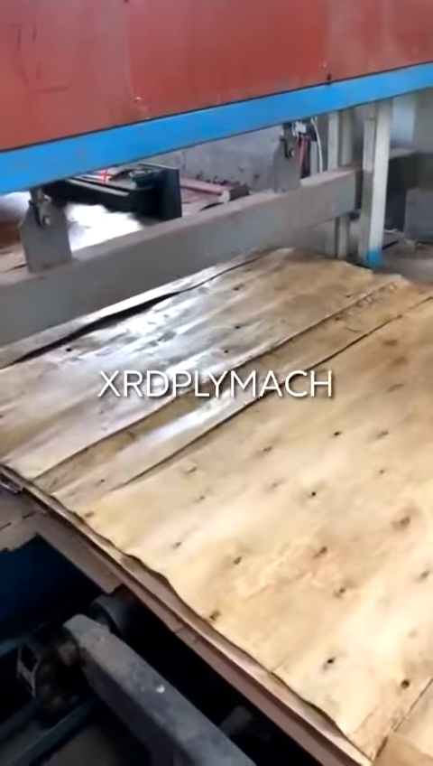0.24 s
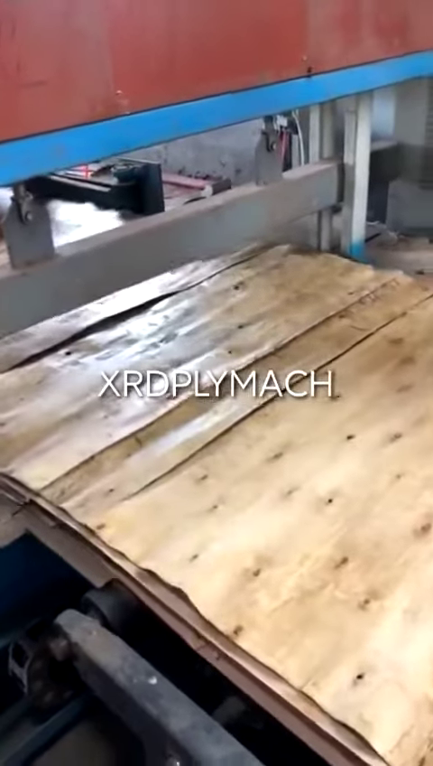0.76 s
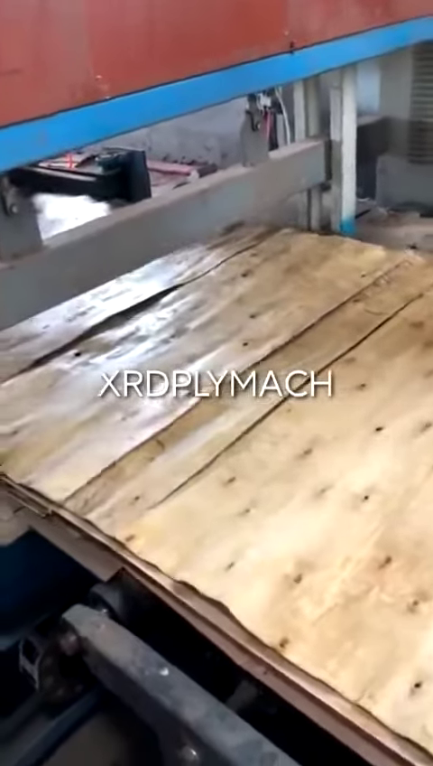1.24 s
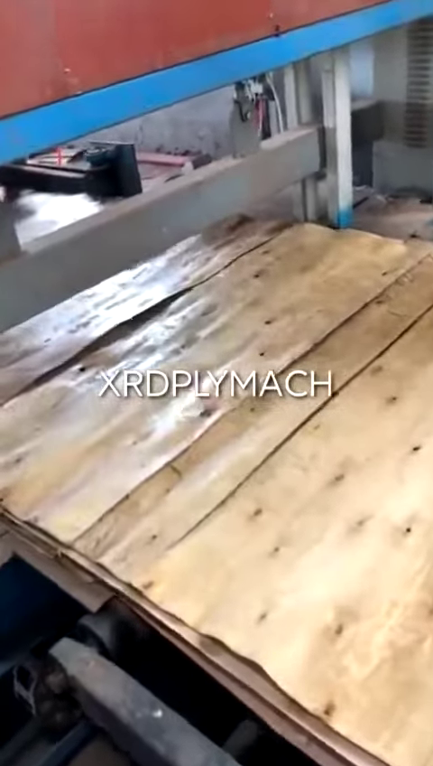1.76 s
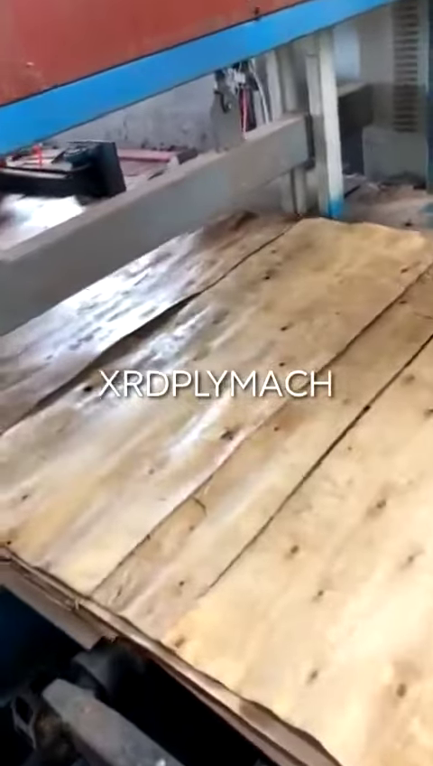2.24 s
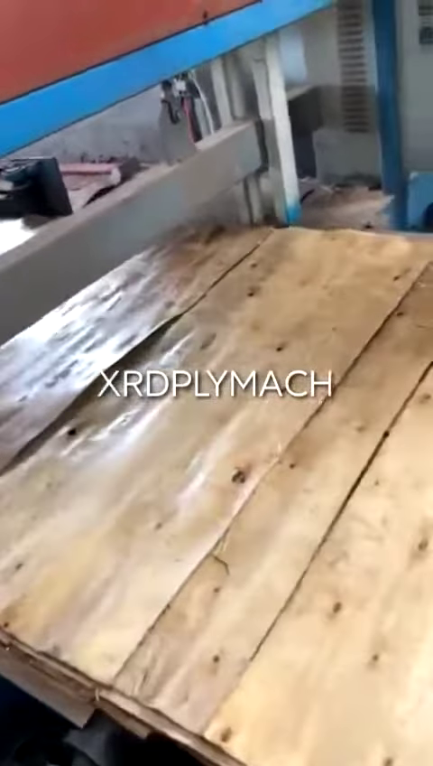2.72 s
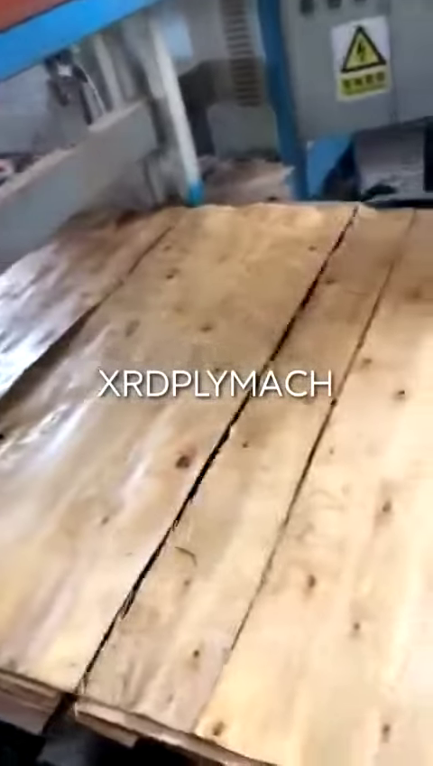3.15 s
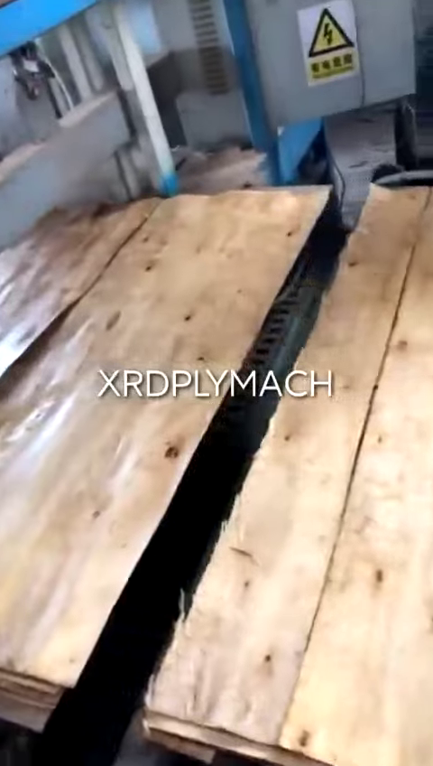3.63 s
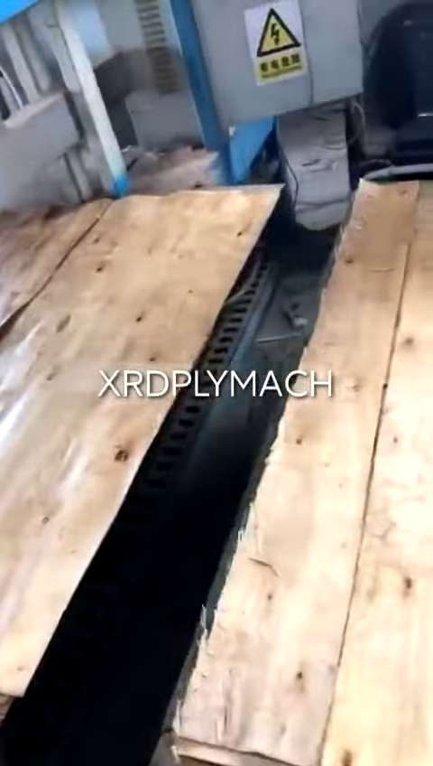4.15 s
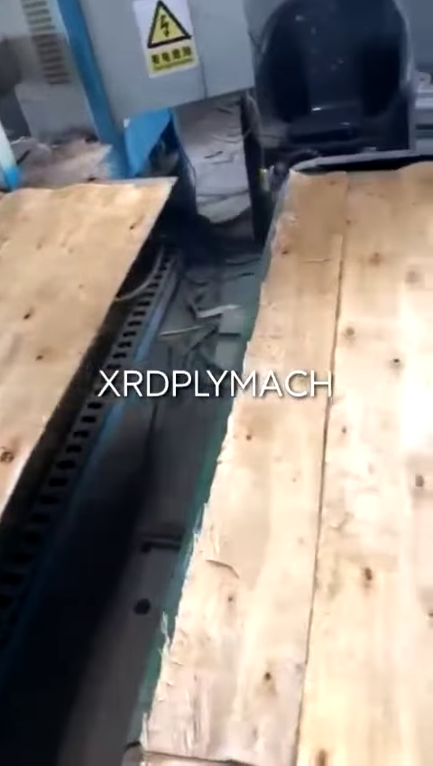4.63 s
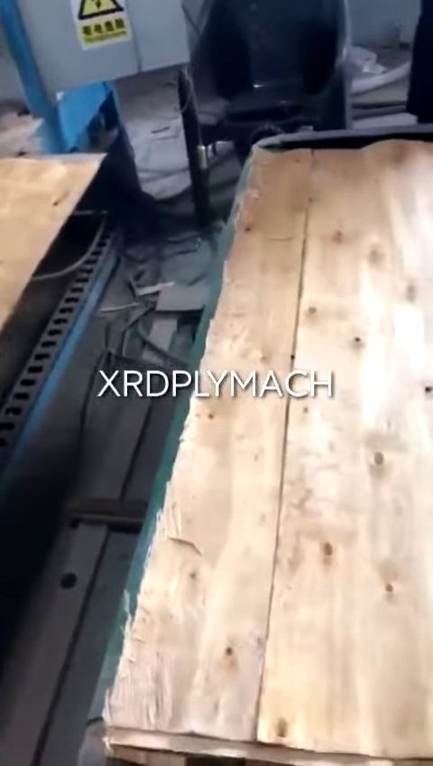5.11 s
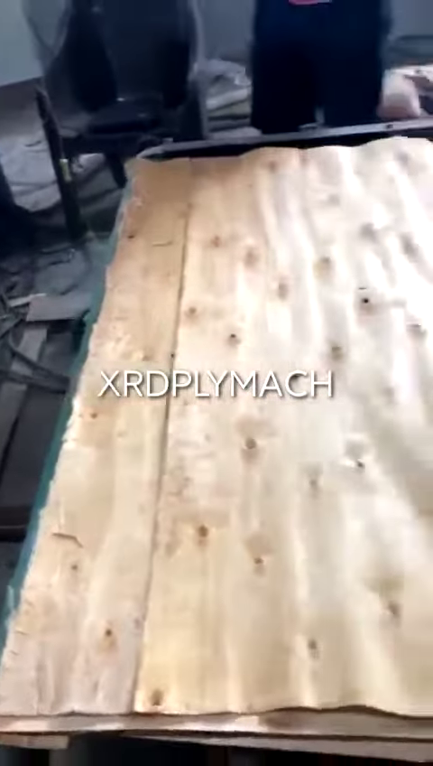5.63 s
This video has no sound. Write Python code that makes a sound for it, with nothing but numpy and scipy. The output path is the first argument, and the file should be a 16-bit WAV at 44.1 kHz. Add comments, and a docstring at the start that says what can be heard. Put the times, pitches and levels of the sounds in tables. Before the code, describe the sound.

Woodworking machinery runs for the whole six seconds in a factory hall, heard from close by. A steady, low-pitched hydraulic pump hum stands out over a dense motor rumble, wavering drones from shaken panels and the even roar of a conveyor. At about 0.7 seconds a metal part some way off is struck once, a bright clack with two quick rebounds that rings briefly in the hall. Wooden sheets slide along the conveyor, gently lifting the roar and scrape around 1, 2.6, 3.5 and 5 seconds. Thin puffs of air hiss at about 2.6, 2.9 and 4.3 seconds. Rollers give faint, short squeaks, mostly between 2.6 and 3.8 seconds, with a few more later. The low drone swells a little after 3 seconds and the rumble just after 4. The hum grows slightly louder toward 5 seconds, and everything keeps running to the end.

```python
"""A hydraulic vane pump hums over the rumble and roar of motors and conveyors in a plywood mill hall.
The hum swells as the microphone moves through standing waves; shaken frames and panels drone around it.
Some way off a metal part is struck once, rattles and rings out in the hall.
Sheets slide along the conveyor, escaping air hisses in swells and rollers squeak faintly."""
import sys
import numpy as np
from scipy import signal
from scipy.fft import rfft, irfft, next_fast_len
from scipy.io import wavfile

SR = 44100
rng = np.random.default_rng(int(sys.argv[2]) if len(sys.argv) > 2 else 0)


def generate_wav(sig):
    """Save sig (samples, or channels by samples) to the path in sys.argv[1] as 16-bit PCM at SR."""
    pcm = np.round(np.clip(np.atleast_2d(sig).T, -1, 1) * 32767).astype(np.int16)
    wavfile.write(sys.argv[1], SR, pcm)


N = 258867
TIME = np.arange(N) / SR

# pump hum at the microphone, moving through standing waves: t/s, level/dB
PUMP_LEVELS = [(0.0, -18.5), (0.06, -19), (0.52, -20), (0.65, -23), (0.69, -19.5), (0.98, -21), (1.09, -19),
               (1.52, -20.5), (2.58, -19), (2.81, -20.5), (2.89, -16), (2.96, -21.5), (3.04, -19),
               (5.13, -16), (5.2, -18), (5.25, -16.5), (5.8, -18.5), (5.87, -21.5)]
# single panels singing out for a while: start/s, length/s, f/Hz, level/dB
PANEL_TONES = [(0, 1.0, 96, -38), (1.55, .7, 96, -37), (2.45, 1.4, 95, -37), (4.55, 1.4, 95, -37),
               (0.98, .36, 169, -25), (1.1, .4, 192, -32), (0, .45, 175, -33), (3.9, .95, 192, -32),
               (4.9, .3, 192, -35), (2.0, .35, 220, -31), (2.88, .25, 218, -31), (3.5, .75, 218, -34),
               (4.5, .45, 220, -32), (5.2, .5, 221, -36), (0, .4, 268, -33), (2.5, .3, 271, -33),
               (3.3, 1.3, 271, -33), (.6, .35, 252, -35), (3.35, .45, 60, -37), (5, .9, 75, -39)]
# frames and panels shaken by a second, slower motor: f/Hz, width/Hz, level/dB
SMALL_FRAME_MODES = [(48.5, 1.5, -45), (72.5, 4, -46), (96, 5, -46), (122, 4, -47), (215, 4, -44),
                     (222, 4, -44), (270, 5, -40), (281, 4, -40), (592, 8, -50), (715, 30, -48),
                     (887, 6, -53)]
# resonances of the big frame: f/Hz, width/Hz, share/dB
BIG_FRAME_MODES = [(170, 5, -5), (180, 8, -6), (194, 5, -4)]
# the big frame drones louder: start/s, length/s, rise/dB
BIG_FRAME_SWELLS = [(3.1, 0.56, 4.5), (5.0, 0.72, 1)]
# floor rumble: f/Hz, relative density/dB
RUMBLE_SPECTRUM = [(28, -45), (45, -24.5), (60, -13.5), (100, -12), (130, -9), (150, -9.5), (165, -5.5),
                   (190, -7), (206, -10.5), (220, -8.5), (237, -10.5), (268, -6), (290, -8.5), (320, -22.5),
                   (420, -40)]
# the rumble swells, as if under a passing load: start/s, length/s, rise/dB
RUMBLE_SWELLS = [(3.15, 0.59, 1.5), (4.15, 0.18, 5.5), (5.35, 0.64, 2.5)]
# noise of the drives: f/Hz, relative density/dB
DRIVE_SPECTRUM = [(230, -22), (310, 0), (400, -4), (550, -5.5), (720, -8), (900, -12.5), (1200, -17),
                  (2000, -34.5)]
# conveyor roar: f/Hz, relative density/dB
ROAR_SPECTRUM = [(600, -21.5), (1000, -5.5), (1500, -4.5), (2400, -9.5), (2900, -14), (4000, -22.5)]
# brighter scrape of the sheets: f/Hz, relative density/dB
SCRAPE_SPECTRUM = [(1800, -20.5), (2800, -6.5), (3800, -5.5), (4800, -7), (6000, -11.5), (8000, -22)]
# sheets sliding along the conveyor: start/s, length/s, roar rise/dB, scrape rise/dB
SHEET_SLIDES = [(1.0, 0.65, 2.5, -0.2), (2.55, 0.46, 1, 4.5), (3.5, 0.46, 2, 0.5), (4.95, 0.71, 3.5, 0.6),
                (5.3, 0.21, 0, 3.5)]
# air hiss: f/Hz, relative density/dB
AIR_SPECTRUM = [(3500, -25), (5200, -10.5), (7500, -8.5), (8800, -12), (10000, -22.5), (11000, -21.5),
                (12000, -44.5)]
# air escaping: start/s, length/s, rise/dB
AIR_PUFFS = [(2.57, 0.24, 6.5), (2.83, 0.22, 9), (3.5, 0.32, 2.0), (4.25, 0.23, 6), (5.55, 0.33, 0)]
# the blow and two lighter, brighter rebounds: t/s at full force, force/dB, bass loss/(dB per octave)
BLOW_CONTACTS = [(0.702, -1, 0), (.785, -6.5, 3.5), (.857, -7, 4)]
# modes of the struck metal part: f/Hz, share/dB, t60/s
METAL_MODES = [(960, -7, .15), (1230, -11, .15), (1448, -9, .12), (1534, -6, .15), (1631, 3, .065),
               (1873, -7, .22), (2160, -12, .2), (2261, 0, .21), (2449, -10, .3), (2543, -7, .28),
               (3106, -12, .3), (3190, -9, .12), (3264, -6, .24), (3440, -11, .3), (3779, -6, .4),
               (3890, -9, .45), (4018, -7, .35), (4250, -7, .3), (4464, -13, .3), (4689, -12, .35),
               (4915, -15, .3), (5300, -13, .25), (5403, -13, .25), (5650, -14, .12), (5905, -13, .15),
               (6121, -15, .2), (7375, -20, .15), (7860, -21, .15), (8048, -20, .15)]
# broad crash of the blow: f/Hz, relative density/dB
CRASH_SPECTRUM = [(700, 3), (1500, -4.5), (2200, -10.5), (2800, -15), (3300, -13), (3550, -11), (4000, -1),
                  (5200, -12.5), (6500, -13), (8500, -19.5), (10500, -35.5)]
# roller squeaks and knocks: start/s, length/s, start f/Hz, end f/Hz, scatter/Hz, level/dB
ROLLER_SQUEAKS = [(2.59, .08, 4930, 4960, 150, -53), (2.78, .035, 2380, 2400, 130, -46),
                  (2.875, .045, 2770, 2770, 80, -48), (2.82, .04, 1300, 1250, 90, -44),
                  (2.92, .03, 1450, 1450, 90, -46), (3.0, .06, 1540, 1540, 35, -50),
                  (3.05, .1, 1720, 1730, 30, -54), (3.155, .21, 1735, 1705, 12, -46.5),
                  (3.41, .09, 1720, 1735, 20, -47), (3.49, .13, 1735, 1715, 30, -51),
                  (1.36, .1, 860, 895, 15, -43), (2.735, .04, 1250, 1220, 60, -45),
                  (2.81, .09, 740, 720, 50, -37), (2.99, .07, 720, 720, 40, -41),
                  (3.6, .06, 1330, 1620, 80, -46), (3.685, .03, 1550, 1550, 90, -45),
                  (3.62, .13, 720, 700, 30, -42), (3.65, .03, 2420, 2420, 60, -50),
                  (3.42, .08, 3890, 3890, 30, -60), (3.58, .14, 3600, 3600, 330, -52),
                  (4.36, .08, 2040, 2015, 20, -51), (5.23, .06, 3930, 3930, 40, -56),
                  (5.42, .08, 2830, 2830, 40, -53)]


def from_db(db):
    """Decibels to gain."""
    return 10 ** (np.asarray(db) / 20)


def rms_one(x):
    """Scale to rms 1."""
    return x / np.sqrt(np.mean(x ** 2) + 1e-20)


def drift(corner_hz):
    """Random wander of rms about 1: noise twice through a one-pole low-pass."""
    step, run_in = 40, 2000
    pole = np.exp(-2 * np.pi * corner_hz * step / SR)
    noise = rng.standard_normal(N // step + run_in + 2)
    slow = signal.lfilter([1], [1, -2 * pole, pole * pole], noise)[run_in:]
    return np.interp(np.arange(N) / step, np.arange(len(slow)), rms_one(slow))


def coloured(spectrum, flicker_db):
    """Noise of a given spectrum, rms 1; bands half an octave apart flicker, partly together."""
    size = next_fast_len(N)
    octave = np.log2(np.arange(size // 2 + 1) * SR / size + 1e-9)
    hz, db = np.transpose(spectrum)
    shape = from_db(np.interp(octave, np.log2(hz), db, left=-90, right=-90))
    bins = rfft(rng.standard_normal(size)) * shape
    out, together = 0, drift(28)
    for centre in np.arange(np.log2(hz[0]), np.log2(hz[-1]) + .5, .5):
        band = irfft(bins * np.clip(1 - 2 * abs(octave - centre), 0, 1), size)[:N]
        out += band * from_db(flicker_db * (0.61 * together + drift(2.6)))
    return rms_one(out)


def swells(rows, edge_s):
    """One curve in dB for each rise column; smooth ramps are centred on every start and end."""
    start, length, *rises = np.transpose(rows)[:, :, None]
    ramp = np.clip(np.minimum(TIME - start, start + length - TIME) / edge_s + .5, 0, 1)
    return [np.sum(rise * np.sin(np.pi * ramp / 2) ** 2, axis=0) for rise in rises]


def ring(force, hz, t60):
    """One mode; a unit click sets a sine of height 1 ringing."""
    r, w = from_db(-60 / (t60 * SR)), 2 * np.pi * hz / SR
    return signal.lfilter([0, np.sin(w)], [1, -2 * r * np.cos(w), r * r], force + 1e-18)


def pump(vane_hz=295.86):
    """A clean vane tone: twelve vanes on a shaft turning about 25 times a second."""
    level_db = np.interp(TIME, *np.transpose(PUMP_LEVELS)) + 0.45 * drift(10) + 0.52 * drift(31)
    return np.sqrt(2) * from_db(level_db) * np.sin(2 * np.pi * vane_hz * TIME + 0.26 * drift(0.37))


def panels():
    """Single panels sing out: low tones that waver under a smooth swell."""
    out = np.zeros(N)
    for start, length, hz, level_db in PANEL_TONES:
        progress = np.clip((TIME - start) / length, 0, 1)
        swell = np.sqrt(2 * np.sin(np.pi * progress) + 1e-12)
        gain = from_db(level_db + 2.9 * drift(1.8)) * swell
        out += gain * np.sin(2 * np.pi * hz * TIME + 0.52 * drift(2.5))
    return out


def drone(hz, width_hz, level_db):
    """A shaken frame or panel: noise twice through its resonance, already sounding at the start."""
    t60 = np.log(1000) / (np.pi * width_hz)
    shaking = rng.standard_normal(N + SR)
    return from_db(level_db) * rms_one(ring(ring(shaking, hz, t60), hz, t60)[SR:])


def frames():
    """Motor-shaken frames drone unsteadily; the three modes of the big one swell together."""
    rise_db, = swells(BIG_FRAME_SWELLS, edge_s=0.23)
    small = sum(drone(*mode) for mode in SMALL_FRAME_MODES)
    big = sum(drone(*mode) for mode in BIG_FRAME_MODES)
    return small + from_db(-35 + rise_db) * big


def motors():
    """The drives run steadily over a floor rumble that swells now and then."""
    rise_db, = swells(RUMBLE_SWELLS, edge_s=0.55)
    rumble = from_db(-28.5 + rise_db) * coloured(RUMBLE_SPECTRUM, flicker_db=0.5)
    drives = from_db(-33.5) * coloured(DRIVE_SPECTRUM, flicker_db=0.9)
    return rumble + drives


def conveyor():
    """The conveyor roars and scrapes throughout, louder as sheets slide along it."""
    roar_rise_db, scrape_rise_db = swells(SHEET_SLIDES, edge_s=0.5)
    roar = from_db(-42.5 + roar_rise_db) * coloured(ROAR_SPECTRUM, flicker_db=1.1)
    scrape = from_db(-51 + scrape_rise_db) * coloured(SCRAPE_SPECTRUM, flicker_db=0.74)
    return roar + scrape


def air():
    """A thin hiss that swells with each puff of escaping air."""
    rise_db, = swells(AIR_PUFFS, edge_s=0.099)
    return from_db(-57.5 + rise_db) * coloured(AIR_SPECTRUM, flicker_db=2.5)


def rattle(hz, bright_hz=3800, rise_db_per_s=452, hold_s=0.037, fall_db_per_s=297):
    """Force in dB of the strongest contact at one pitch; the rebounds weaken below bright_hz."""
    peak_s, force_db, loss_db = np.transpose(BLOW_CONTACTS)[:, :, None]
    octaves_below = max(np.log2(bright_hz / hz), 0)
    below_peak_db = np.maximum(rise_db_per_s * (peak_s - TIME), fall_db_per_s * (TIME - peak_s - hold_s))
    return np.max(force_db - loss_db * octaves_below - np.clip(below_peak_db, 0, 120), axis=0)


def hall(x, wet_db, t60=1.22):
    """The direct sound plus the hall's diffuse tail of dying white noise."""
    t = np.arange(2 * SR) / SR
    tail = rng.standard_normal(len(t)) * from_db(-60 * t / t60)
    tail /= np.sqrt(np.sum(tail ** 2))
    return x + from_db(wet_db) * signal.fftconvolve(x, tail)[:len(x)]


def metal_blow(growth=1.3, heard_s=2.5):
    """Metal struck some way off: dense contacts, carried by the hall, drive its modes and a crash."""
    n = int(heard_s * SR)
    grip_db = drift(80)
    ringing = np.zeros(N)
    for hz, share_db, t60 in METAL_MODES:
        strength = from_db(growth * (rattle(hz) + grip_db))   # sound grows faster than force
        contacts = strength[:n] * rng.standard_normal(n)
        wet_db = -6 + np.log2(.5 / t60)   # 1 dB more hall for each halving of t60
        ringing[:n] += from_db(share_db) * rms_one(ring(hall(contacts, wet_db), hz, t60))
    crash_db = -33 + growth * (rattle(hz=3800) + grip_db)
    crash = from_db(crash_db) * coloured(CRASH_SPECTRUM, flicker_db=1.8)
    return from_db(-52.5) * ringing + hall(crash, wet_db=0.5)


def rollers(flutter_db=1.3, edge_share=.15):
    """Faint stick-slip squeaks that glide, scatter in pitch and flutter with the uneven grip."""
    out = np.zeros(N)
    for start, length, start_hz, end_hz, scatter_hz, level_db in ROLLER_SQUEAKS:
        progress = np.clip((TIME - start) / length, 0, 1)
        hz = start_hz + (end_hz - start_hz) * progress + scatter_hz * drift(120)
        swell = np.clip(np.minimum(progress, 1 - progress) / edge_share, 0, 1)
        gain = from_db(level_db + flutter_db * drift(30)) * swell
        out += gain * np.sqrt(2) * np.sin(2 * np.pi * np.cumsum(hz) / SR)
    return out


def scene():
    """The whole mill hall at one microphone."""
    return (pump() + panels() + frames() + motors() + conveyor() + air() + metal_blow() + rollers())[None]


def record(dry):
    """The microphone signal is cut steeply, 70 dB down at 12.1 kHz; the last half millisecond fades."""
    low_pass = signal.cheby2(12, 70, 12100, fs=SR, output="sos")
    fade = np.clip((N - np.arange(N)) / (.0005 * SR), 0, 1)
    return fade * signal.sosfilt(low_pass, dry)


dry = scene()
out = record(dry)
generate_wav(out)
```